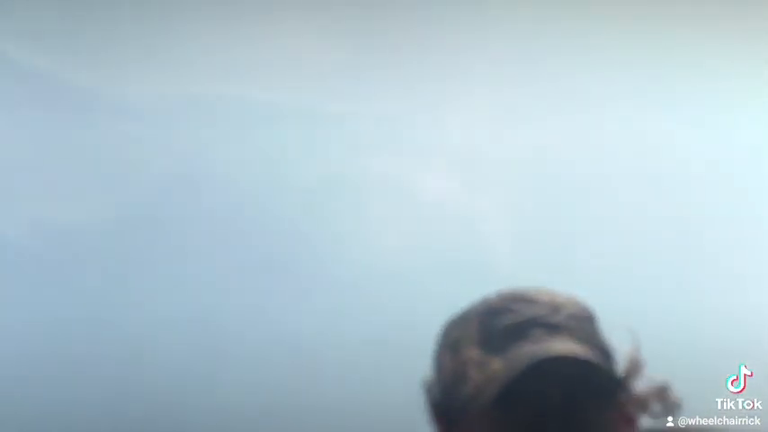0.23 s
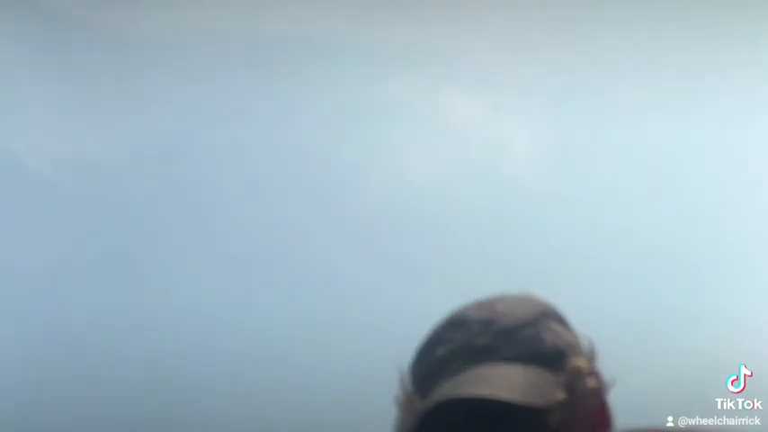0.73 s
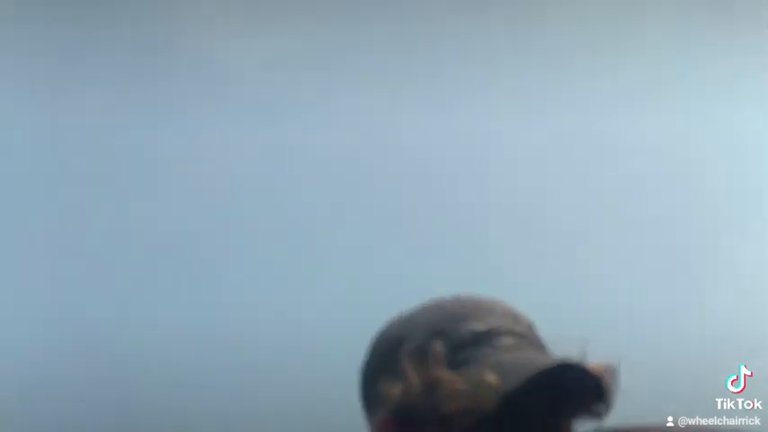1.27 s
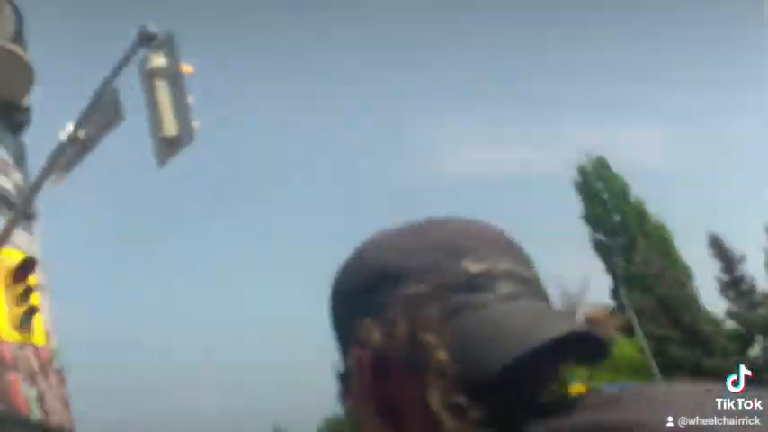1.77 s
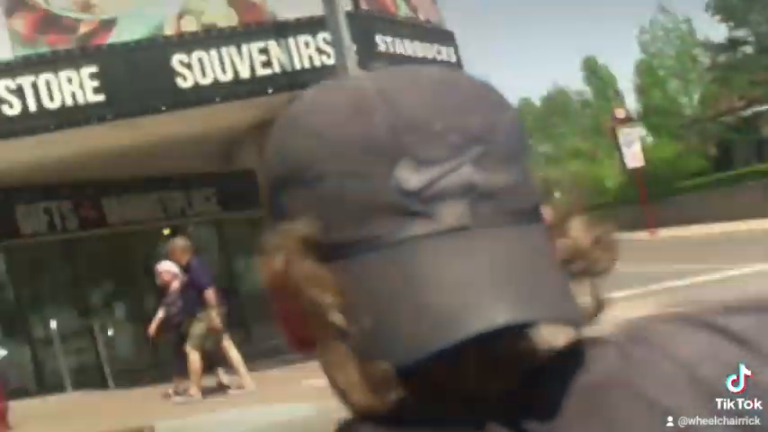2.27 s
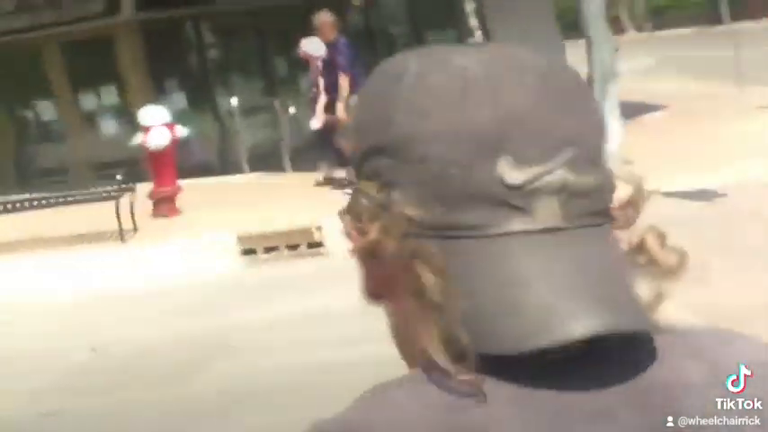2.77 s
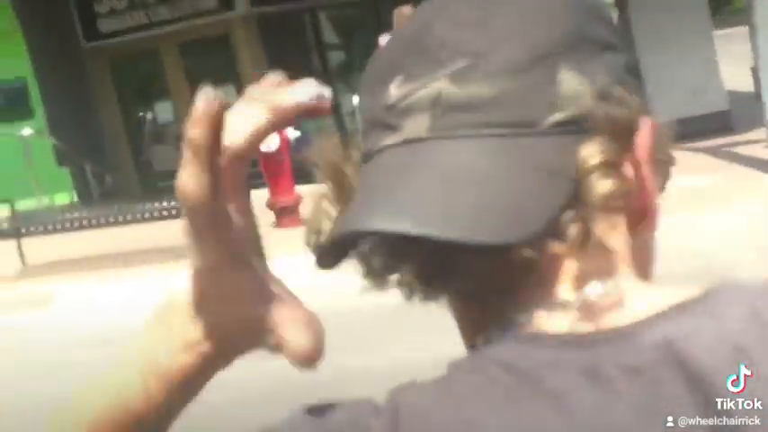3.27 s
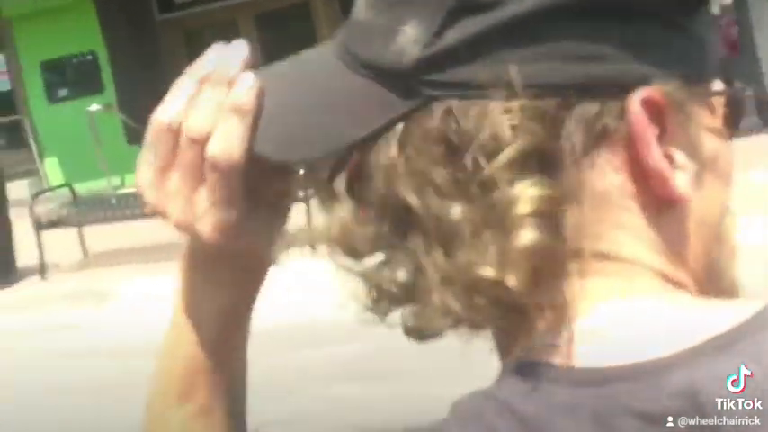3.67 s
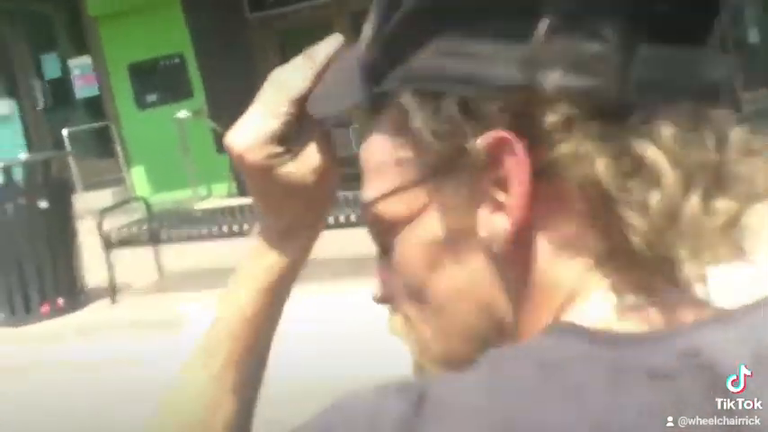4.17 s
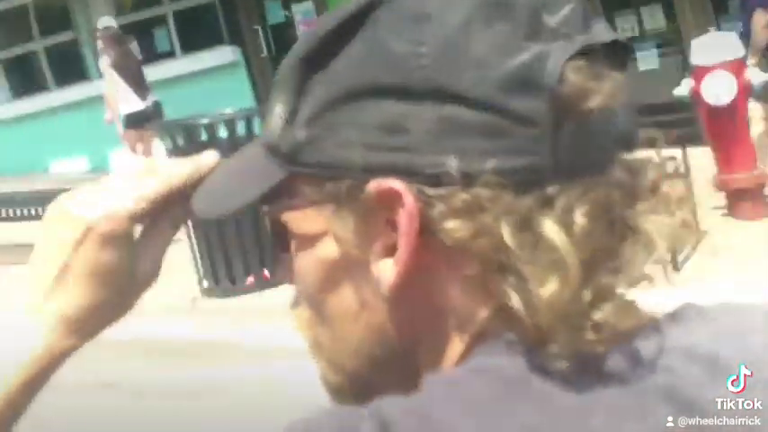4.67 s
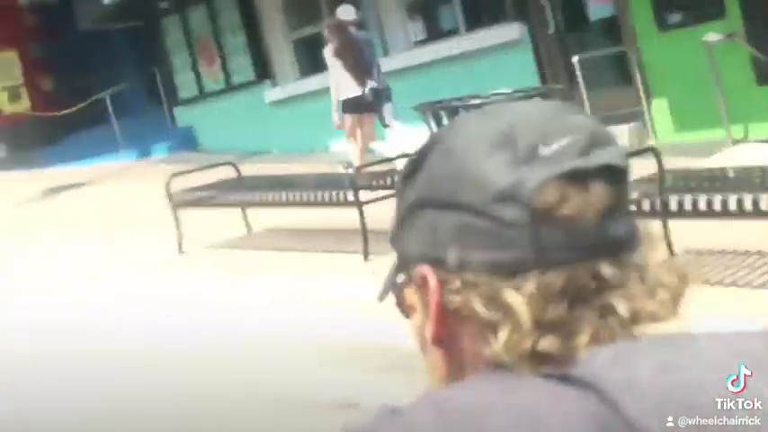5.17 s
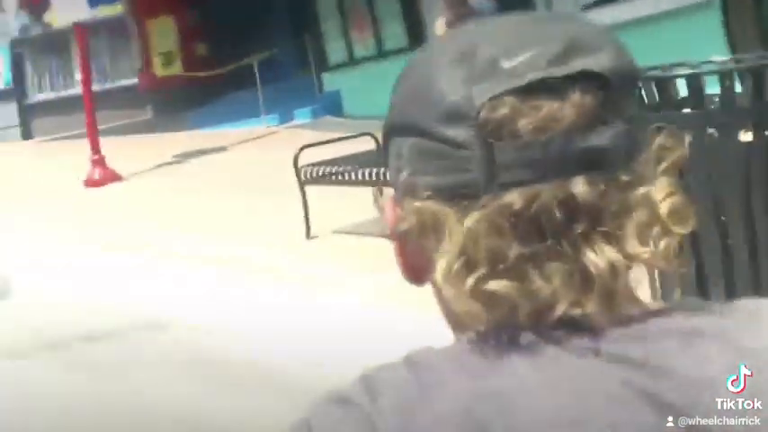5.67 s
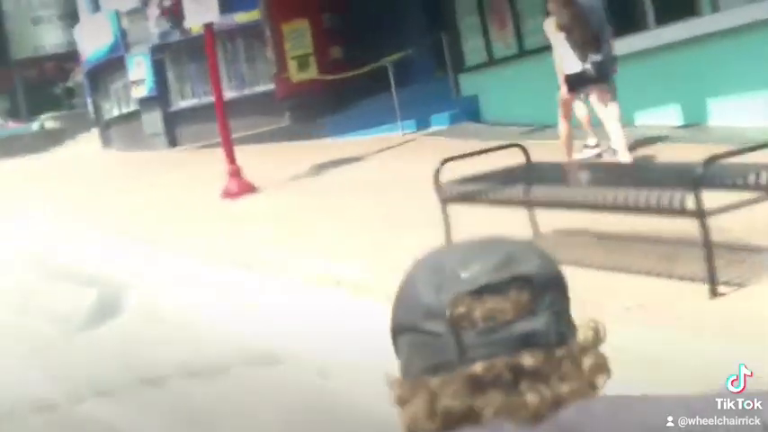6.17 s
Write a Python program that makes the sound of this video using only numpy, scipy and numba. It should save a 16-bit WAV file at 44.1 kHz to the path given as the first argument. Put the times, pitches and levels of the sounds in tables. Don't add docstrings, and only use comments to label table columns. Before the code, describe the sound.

Wheelchair tyres hiss fast over pavement while strong wind whistles, puffs and thumps across a hand-held phone microphone, with frame ringing and a brief metallic tick.

```python
import sys
import numpy as np
from scipy import signal
from scipy.fft import rfft, irfft, next_fast_len
from scipy.io import wavfile
from scipy.ndimage import uniform_filter1d
from numba import njit

SR = 44100
rng = np.random.default_rng(int(sys.argv[2]) if len(sys.argv) > 2 else 0)


def voltage_ratio(level):
    return 10 ** (np.asarray(level, float) / 20)


def master(y):
    cut = np.clip(np.atleast_2d(y).T, -1, 1)
    pcm = np.round(cut * 32767)
    wavfile.write(sys.argv[1], SR, pcm.astype(np.int16))


N = 282681
T = np.arange(N) / SR


def columns(table):
    s, *rest = np.transpose(table)
    return [np.interp(T, s, c) for c in rest]


def unit(x):
    return x / np.sqrt(np.mean(x ** 2))


def shape(x, points):
    hz, db = np.transpose(points)
    size = next_fast_len(len(x))
    axis = np.log(np.maximum(np.fft.rfftfreq(size, 1 / SR), 1))
    return irfft(rfft(x, size) * voltage_ratio(np.interp(axis, np.log(hz), db)), size)[:len(x)]


def band(x, lo_hz, hi_hz):
    return signal.sosfilt(signal.butter(3, [lo_hz, hi_hz], "band", fs=SR, output="sos"), x)


@njit
def resonate(x, hz, width):
    y, b, l = np.empty(len(x)), 0., 0.
    for i in range(len(x)):
        g, k = np.tan(np.pi * hz[i] / SR), width / hz[i]
        v = (b + g * (x[i] - l)) / (1 + g * (g + k))
        b, l, y[i] = 2 * v - b, l + 2 * g * v, k * v
    return y


def walk(rate):
    k = int(SR / rate)
    held = np.repeat(rng.standard_normal(N // k + 1), k)
    return unit(uniform_filter1d(uniform_filter1d(held, k), k)[:N])


def noise():
    return rng.standard_normal(N)


def add(out, s, x):
    i = int(s * SR)
    out[i:i + len(x)] += x[:N - i]


# t/s, big eddies level/dB, small eddies level/dB
WIND = [(0, -20.5, -22.5), (.6, -17, -28), (1.1, -14, -27), (1.4, -19, -26.5), (2.0, -14.5, -27),
        (2.45, -15, -37.5), (3.0, -10, -28.5), (3.6, -14.5, -31), (4.0, -9.5, -30.5), (4.3, -15.5, -31.5),
        (4.9, -14, -39.5), (5.4, -11, -33.5), (5.55, -16, -40), (5.7, -15, -35), (5.9, -15.5, -27.5),
        (6.41, -18.5, -25.5)]
# f/Hz, level/dB per Hz
EDDIES = [(8.8, -68.5), (15, 8), (29, -5), (94, -8), (180, -19), (301, -21.5), (357, -25), (389, -27.5),
          (900, -43), (1170, -66), (1980, -120)]


def wind():
    big_db, small_db = columns(WIND)
    thump, flutter, lull = gusts()
    big_db = big_db + thump - 0.57 * lull
    small_db = small_db + flutter - lull
    flow, gust = shape(noise(), EDDIES), walk(45)
    big = 1.15 * band(flow, 7.2, 70) * voltage_ratio(.6 * walk(14) + 2.0 * gust)
    big = big + band(flow, 67, 154.6) * voltage_ratio(1.5 * gust)
    small = band(flow, 194.5, 404) * voltage_ratio(2.67 * gust)
    small = small + band(flow, 400, 1400) * voltage_ratio(3.2 * gust + 3.9 * walk(120))
    stray = np.zeros(N)
    for rise_ms in (1.2, 2.4, 4.5):
        moments = (rng.random(N) < 14 / SR) * rng.standard_normal(N)
        stray += signal.fftconvolve(moments, flip(rise_ms, 0.0045), "same")
    big = unit(big) + voltage_ratio(-7.0) * unit(stray)
    return big * voltage_ratio(big_db - 1.5) + unit(small) * voltage_ratio(small_db - 2.0)


# t/s, thump level/dB, flutter level/dB, drop in the lull after/dB
GUSTS = [(.185, -2.5, 5, 6), (0.239, 16, 4.5, 10.5), (.46, 2, 7.5, -5), (0.713, -6, 11.5, -5.5),
         (.91, 4.5, -7.5, 8.5), (1.127, 1.5, 1, 12), (1.2, 8.5, 5, 27), (1.254, 2, 23.5, 12),
         (1.329, 5, 12.5, 13), (1.745, -3.5, 5.5, -0.5), (1.89, 0.5, 7, 16), (2.172, 6, 8.5, -4),
         (2.221, 5, 2, 5), (3.1, 3, -22, 19), (3.26, 6, 6.5, 12.5), (3.466, 11.5, -3, 18.5),
         (3.578, 6.5, 6.5, 17), (3.69, 1.5, -7, 22.5), (3.869, 3, -8, 14), (3.94, 7.5, 19.5, 1),
         (4.415, 4, -10, 16), (4.52, 6, 4, -4.5), (4.621, -2.5, 8, 11.5), (4.971, 12.5, 4.5, -2.5),
         (5.05, -2.5, 0, 6.5), (5.141, 4, 10, 4), (5.22, 3, -2, -6), (5.265, -2, 5, 9.5),
         (5.49, 0, -21, 6.5), (5.54, -3.5, 10, 11.5)]


def gusts():
    rise_s, fall_s, lull_at_s, lull_end_s = 0.053, 0.036, 0.034, 0.075
    s, thump, flutter, lull = np.transpose(GUSTS)
    since = T - s[:, None]
    swell = np.interp(since, [-rise_s, 0, fall_s], [0, 1, 0])
    calm = np.interp(since, [0, lull_at_s, lull_at_s + lull_end_s], [0, 1, 0])
    return thump @ swell, flutter @ swell, lull @ calm


def flip(rise_ms, tail_s):
    t = np.arange(-1200, 1200) / SR
    return np.tanh(t * 1000 / max(rise_ms, .1)) * np.exp(-np.abs(t) / tail_s) * np.hanning(len(t))


# t/s, peak level/dB, rise time/ms
FLIPS = [(2.17, -24, 0.55), (2.208, -17, 0.22), (2.629, -20, 0.61), (2.711, -18, 0.78), (2.872, -22, 1),
         (3.165, -26, 0.47), (3.276, -25, 0.76), (3.47, -10.5, 0.64), (3.562, -23, 0.74),
         (3.694, -20.5, 0.32), (3.732, -15.5, 0.41), (3.754, -17, 0.31), (3.834, -27, 0.5),
         (3.874, -14, 0.48), (3.932, -18.5, 0.42), (3.976, -18.5, 0.33), (4.045, -17, 0.73),
         (4.13, -33.5, 0.91), (4.165, -23, 0.17), (4.209, -21.5, 0.28), (4.27, -22.5, 0.51),
         (4.311, -12, 0.74), (4.35, -12.5, 0.43), (4.396, -22.5, 0.13), (4.414, -28.5, 0.14),
         (4.496, -22, 0.62), (4.59, -10, 0.89), (5.004, -16, 1), (5.212, -18.5, 0.83), (6.155, -18.5, 0.58),
         (3.484, -26, 1), (3.573, -22.5, 0.6), (3.599, -28, 0.55), (3.684, -19, .5), (3.764, -24.5, 0.3),
         (3.772, -23, 0.29), (3.81, -31, 0.29), (3.848, -24, 0.49), (3.941, -22.5, 0.5), (3.958, -24, .3),
         (4.007, -29.5, .5), (4.063, -33, .5), (4.089, -28.5, .4), (4.233, -24, 0.54), (4.375, -18.5, 1),
         (4.523, -17, 0.96), (4.551, -26.5, 0.89), (4.623, -11, .8), (4.75, -23.5, 0.66),
         (4.969, -17.5, .7)]


def letting_go():
    out = np.zeros(N)
    t = np.arange(1500) / SR
    centre_s = 1200 / SR
    for (s, db, rise_ms), (side, late) in zip(FLIPS, rng.random((len(FLIPS), 2))):
        after_s = s + .012 * (2 * late - .7)
        add(out, after_s - centre_s, np.sign(.5 - side) * voltage_ratio(db + 4.5) * flip(rise_ms, 0.002))
        uneven = voltage_ratio(6 * rng.standard_normal(1500 // 50).repeat(50))
        rags = band(rng.standard_normal(1500) * uneven, 220, 700 / max(rise_ms, .3) ** .5)
        add(out, s, voltage_ratio(db - 15) * unit(rags) * np.exp(-t / 0.0058))
        add(out, s + 0.0022 - centre_s, np.sign(side - .5) * voltage_ratio(db + 9.0) * flip(rise_ms, 0.0018))
    return out


# t/s, level/dB, f/Hz
WHISTLE = [(.2, -15.5, 626), (.4, -30.5, 540), (.48, -18.5, 670), (.64, -25, 539), (.72, -30, 650),
           (.8, -16.5, 746), (.84, -27.5, 890), (.93, -27.5, 1000), (.96, -34, 500), (1.0, -22, 575),
           (1.4, -20, 706)]


def whistle():
    opening = T < .2
    level_db, hz = columns(WHISTLE)
    _, flutter, lull = gusts()
    level_db = level_db + 0.16 * flutter - 1.3 * lull
    level_db = np.where(opening, -14 - 8 * T, level_db)
    hz = np.where(opening, 1020 - 650 * T, hz)
    hz = hz * (1 + .03 * walk(40))
    wavering = unit(resonate(resonate(noise(), hz, 260.0), hz, 500.0))
    clean = 1.05 * unit(resonate(resonate(noise(), hz, 144.0), hz, 305.0))
    breath = np.interp(T, [.2, .8], [.45, 1.1])
    tone = np.where(opening, clean, wavering) + breath * unit(band(noise(), 296, 920))
    edge_on = np.interp(T, [.76, .84, .93, 1.0], [0.16, 1.2, 1.4, 0.54])
    tone = tone + edge_on * unit(band(noise(), 600, 1500) + 0.16 * band(noise(), 1400, 2300))
    fade_out = np.clip((WHISTLE[-1][0] - T) / 0.024, 0, 1)
    return tone * voltage_ratio(level_db - 7.0 + 2.8 * walk(90.5)) * fade_out


# t/s, peak level/dB, f/Hz, length/s
PUFFS = [(0.228, -7, 753, 0.0095), (.245, -9.5, 620, .01), (0.313, -9.5, 783, 0.012),
         (0.376, -5, 496, 0.011), (0.422, -5.5, 423, 0.0073), (0.459, -5.5, 694, 0.014),
         (0.537, -11, 437, 0.014), (0.622, -12, 458, 0.024), (0.661, -2.5, 576, 0.0059),
         (0.696, -4.5, 705, 0.029), (0.746, -7.5, 580, 0.008), (0.85, -33, 452, 0.0092),
         (1.002, -7, 570, 0.0057), (1.025, -12.5, 624, 0.017), (1.114, -18, 410, 0.013),
         (1.167, -13, 560, 0.0065), (1.188, -6.5, 760, 0.027), (1.251, -7.5, 553, 0.015),
         (1.315, -8, 792, 0.01), (1.342, -9, 594, 0.0081), (1.486, -15, 320, 0.021),
         (1.589, -5, 309.5, 0.0069), (1.7, -18.5, 307, 0.035), (1.737, -9, 331, 0.0078),
         (1.84, -12, 286, 0.0079), (1.866, -20.5, 262, 0.0044), (1.892, -4, 511, 0.0053),
         (2.03, -11.5, 422, 0.008), (2.077, -11, 412, 0.01), (2.205, -9.5, 644, 0.0044),
         (0.221, -14.5, 563, 0.012), (0.289, -19.5, 544, 0.01), (.343, -15.5, 515, 0.0048),
         (0.358, -10.5, 422, 0.0089), (0.41, -13.5, 596, 0.0088), (0.482, -13, 545, 0.0049),
         (0.504, -11, 720, .008), (0.52, -18.5, 648, .008), (0.53, -7.5, 713, 0.0065),
         (0.557, -17, 588, 0.0081), (.591, -17, 550, 0.0086), (.765, -10, 778, 0.0097),
         (0.798, -15.5, 898, .01), (0.901, -12, 1147, 0.0048), (0.926, -20, 887, 0.007),
         (1.045, -19, 694, 0.0054), (1.057, -11.5, 486, 0.0039), (1.079, -11, 623, .007),
         (1.133, -11, 592, 0.01), (1.307, -16.5, 600, 0.0077), (1.354, -13.5, 708, 0.0065)]


def puffs():
    out = np.zeros(N)
    rough = unit(band(noise(), 243, 774))
    for (s, db, f, length), (phase, glide) in zip(PUFFS, rng.random((len(PUFFS), 2))):
        t = np.arange(int(max(length, .003) * 2 * SR)) / SR
        swell = np.sin(np.pi * (t / t[-1]) ** 0.5) ** 2.4
        wobble = np.cumsum(rng.standard_normal(len(t))) * 0.017
        cycles = phase + f * t * (1 + 3.0 * (glide - .5) * t)
        ring = np.sin(2 * np.pi * cycles + wobble)
        add(out, s - .001, voltage_ratio(db - 6.0) * swell * (ring + 0.66 * rough[int(s * SR):][:len(t)]))
    return out


# t/s, rolling level/dB, frame ring level/dB
ROAD = [(0, -43.5, 0.5), (1.0, -46, -8), (1.5, -36.5, -2), (1.85, -37, -1), (2.1, -37, -7.5),
        (2.5, -35, -6.5), (2.85, -37.5, -3.5), (3.4, -34.5, -7.5), (3.65, -44.5, -11), (4.05, -49.5, -4),
        (4.4, -46.5, -10), (4.8, -38.5, -8.5), (5.35, -38, -10), (5.75, -32.5, -9), (6.15, -30, -8.5),
        (6.41, -34.5, -4.5)]
# f/Hz, level/dB per Hz
TYRES = [(150, 2.5), (500, -5.5), (1100, -11.5), (1700, -10.5), (2300, -12.5), (3300, -16), (6300, -20),
         (7000, -21.5), (7700, -33.5), (8600, -38.5), (10000, -32.5), (12000, -41), (15000, -49)]
# f/Hz, width/Hz, level/dB
FRAME = [(1343, 45, 4.5), (1450, 60, -1), (1961, 40, 4), (2070, 60, -5), (2460, 42, -4), (2874, 30, 0),
         (3417, 60, -12), (4075, 36, -8), (4641, 45, -12), (6095, 45, -15), (1573, 45, -9), (3162, 45, -12),
         (4360, 50, -13), (5875, 40, -15)]
# t/s, level/dB
FACING = [
    (0, -1.5),
    (.9, -2),
    (1.4, -9),
    (2.1, -13.5),
    (2.7, -0.5),
    (3.2, -2.5),
    (5, -1.5),
    (6.41, -2.2),
]


def rolling():
    level_db, ring_db = columns(ROAD)
    lost_db = ducking()
    level_db, ring_db = level_db - lost_db, ring_db + 0.21 * lost_db
    turned = voltage_ratio(columns(FACING)[0]) - 1
    grit = noise() * voltage_ratio(0.21 * walk(25) + 1.2 * walk(150))
    hiss = shape(grit, TYRES)
    hiss = hiss + turned * shape(hiss, [(2500, -18), (4000, -5.5), (7400, -5), (8400, -33)])
    rings = np.zeros(N)
    for hz, width, db in FRAME:
        shaken = grit * voltage_ratio(3.9 * walk(30))
        mode = unit(resonate(shaken, np.full(N, 1. * hz), 1. * width))
        rings += voltage_ratio(db) * mode * np.sqrt(width)
    rings = shape(rings, [(6800, 0), (8000, -25)])
    rings = rings + turned * shape(rings, [(3000, -30), (4000, 0)])
    return (unit(hiss) + voltage_ratio(ring_db) * unit(rings)) * voltage_ratio(level_db + 5.0)


# t/s, depth/dB, climb back/s
DUCKS = [(0, 27, 0.21), (.07, 13.5, 0.24), (.525, 14, 0.1), (.735, 19, 0.055), (.815, 13, 0.16),
         (1.04, 6.5, 0.38), (1.216, 12, 0.28), (1.895, 12.5, 0.078), (2.089, 8, 0.11), (2.18, 12, 0.16),
         (2.212, 18, 0.21), (2.672, 9, 0.31), (2.828, 11.5, 0.22), (2.994, 8.5, 0.21), (3.248, 16, 0.16),
         (3.466, 14, 0.2), (3.7, 9, 0.055), (3.8, 4, 0.21), (3.875, 5.5, 0.058), (3.95, 4, 0.31),
         (4.2, 4, 0.11), (4.41, 5, .17), (4.61, 5, 0.061), (4.964, 15, 0.1), (5.074, 14.5, 0.067),
         (5.142, 8, 0.22), (5.432, 15, 0.22), (6.201, 2, 0.08)]


def ducking():
    s, depth, climb = np.transpose(DUCKS)
    k = np.maximum(np.searchsorted(s, T) - 1, 0)
    lost = depth[k] * np.clip(1 - (T - s[k]) / climb[k], 0, 1)
    return uniform_filter1d(lost, int(0.011 * SR))


# t/s, peak level/dB, f/Hz
TICKS = [
    (2.9306, -18, 5170),
    (2.9407, -17.5, 6350),
    (2.954, -21, 5760),
    (2.9654, -28.5, 5850),
    (2.972, -23.5, 3560),
    (2.9774, -19, 6100),
    (2.9884, -27, 5770),
    (3.0004, -29.5, 5900),
    (2.9616, -33.5, 6500),
]


def loose_part():
    out = np.zeros(N)
    t = np.arange(400) / SR
    for s, db, hz in TICKS:
        rebound = .22 * (t > .0015) * np.exp(-(t - .0015) / .001)
        blow = rng.standard_normal(len(t)) * (np.exp(-t / .0005) + rebound)
        pitch = np.full(len(t), 1. * hz)
        ring = resonate(resonate(blow, pitch, 1500.0), pitch, 2100.0) + .06 * blow * np.exp(-t / .0004)
        add(out, s, voltage_ratio(db) * ring / np.abs(ring).max())
    return out


# t/s, length/s, start f/Hz, end f/Hz, level/dB
SQUEAKS = [
    (1.755, .033, 4900, 6200, -38.5),
    (1.788, .03, 3800, 5400, -38.5),
    (1.862, .023, 3400, 4700, -39),
    (.56, .04, 9500, 9400, -58),
    (2.375, .035, 12600, 11400, -57),
]


def bearings():
    out = np.zeros(N)
    for s, length, hz0, hz1, db in SQUEAKS:
        u = np.linspace(0, 1, int(length * SR))
        hz = hz0 + (hz1 - hz0) * np.sin(np.pi / 2 * u)
        rub = unit(resonate(rng.standard_normal(len(u)), hz, hz0 / 18))
        squeak = voltage_ratio(db - 1) * np.sin(np.pi * u) * rub
        add(out, s, squeak)
        add(out, s + 0.014, voltage_ratio(-1) * squeak)
    return out


def scene():
    limit = 0.52
    air = wind() + letting_go() + whistle() + puffs()
    air = limit * np.tanh(air / limit)
    return (air + rolling() + loose_part() + bearings() + voltage_ratio(-72) * noise())[None]


# t/s, peak level/dB
STEPS = [(0.0443, -34), (0.7743, -40), (0.806, -35), (0.9223, -46.5), (1.1926, -46.5), (2.2075, -42),
         (2.2231, -37), (2.831, -42), (2.929, -52.5), (3.002, -41), (3.2628, -52), (3.541, -38.5),
         (3.5806, -44.5), (3.599, -36), (3.8132, -45.5), (3.8427, -43.5), (3.8457, -37.5), (3.875, -41.5),
         (4.1335, -39), (4.1976, -56.5), (4.1978, -38.5), (4.2098, -38.5), (4.227, -40.5), (4.3574, -34),
         (4.4028, -46), (4.996, -37.5), (5.09, -53), (5.105, -38), (5.4769, -37.5), (6.1944, -40.5)]


def gain_clicks(dry):
    block_s, first_s, settle_s = 256 / 48000, .0065, 0.0015
    jumps = np.zeros(N)
    edges = (np.arange(first_s, N / SR, block_s) * SR).astype(int)
    busy_db = 0.33 * (columns(WIND)[0] + ducking() + 20)[edges]
    jumps[edges] = 0.029 * rng.laplace(size=len(edges)) * dry[0, edges] * voltage_ratio(busy_db)
    jumps[1] = voltage_ratio(-8.0)
    for s, db in STEPS:
        i = int(s * SR)
        jumps[i + 30] += voltage_ratio(db + 13.0) * np.sign(dry[0, i])
    return signal.lfilter([1], [1, -np.exp(-1 / (settle_s * SR))], jumps)


def roll_off(x):
    return signal.sosfilt(signal.butter(12, 15700, fs=SR, output="sos"), x)


def record(dry):
    mix = np.clip(dry + gain_clicks(dry), -.54, .54)
    return roll_off(mix)


dry = scene()
out = record(dry)
master(out)
```